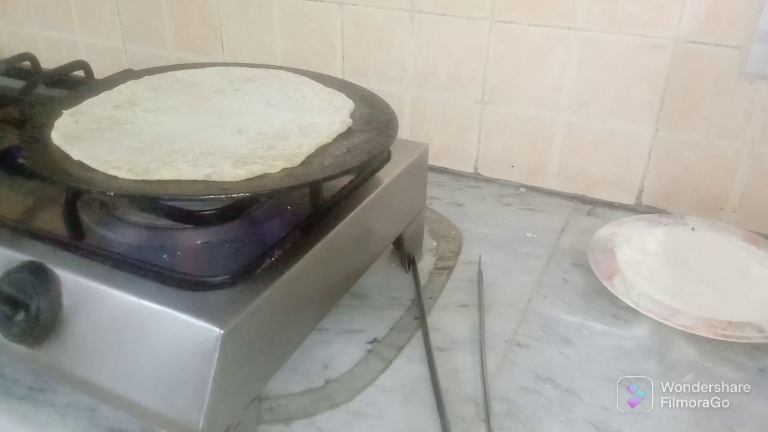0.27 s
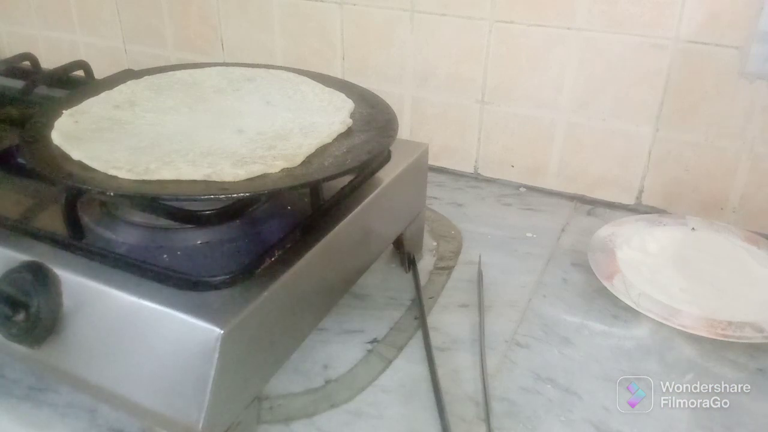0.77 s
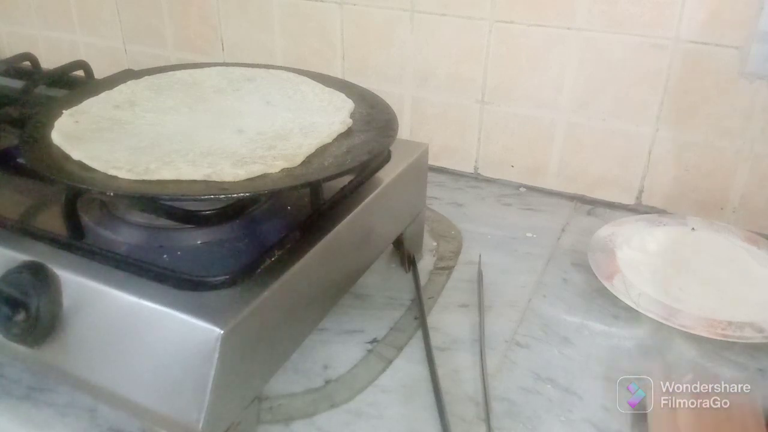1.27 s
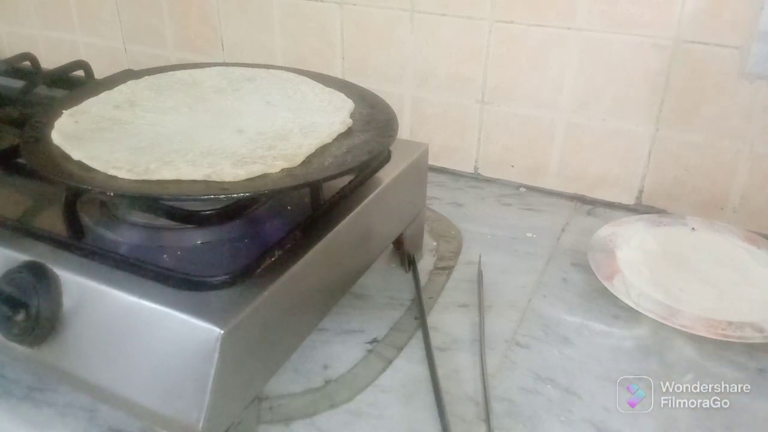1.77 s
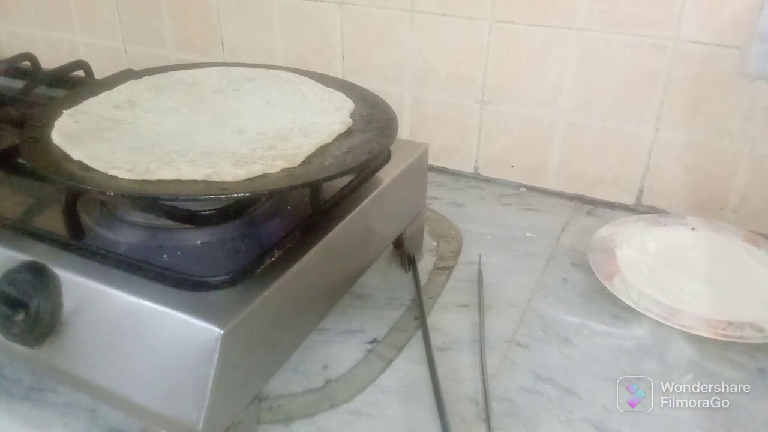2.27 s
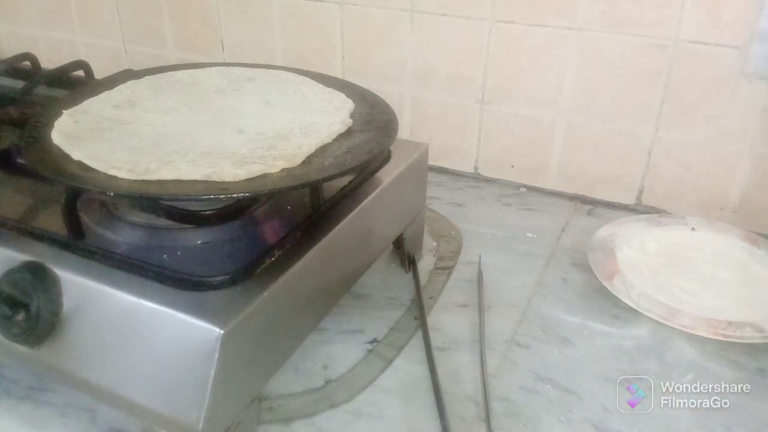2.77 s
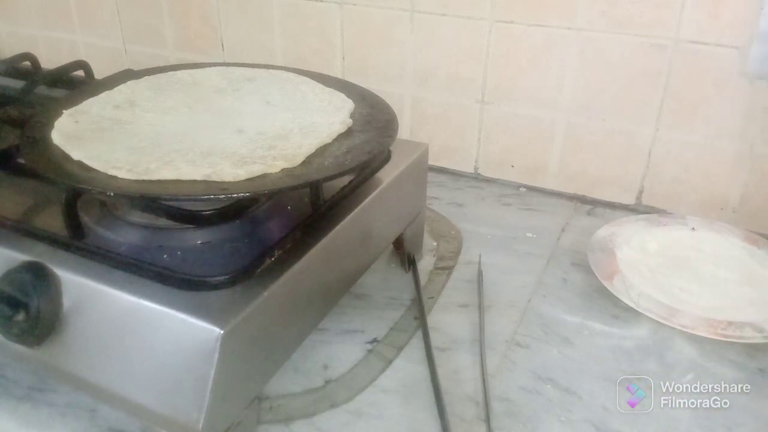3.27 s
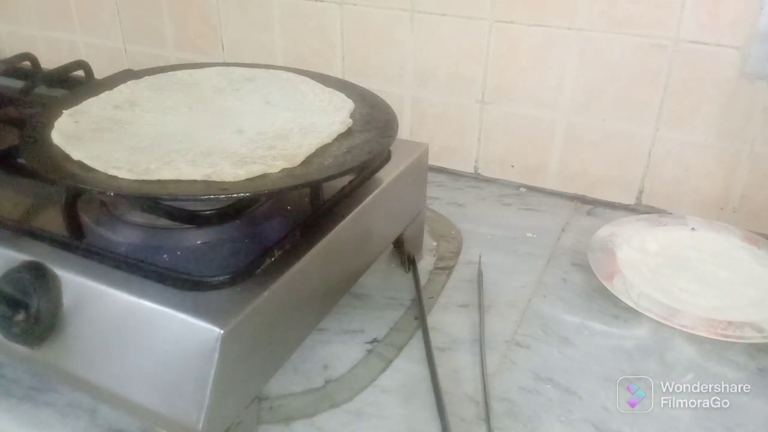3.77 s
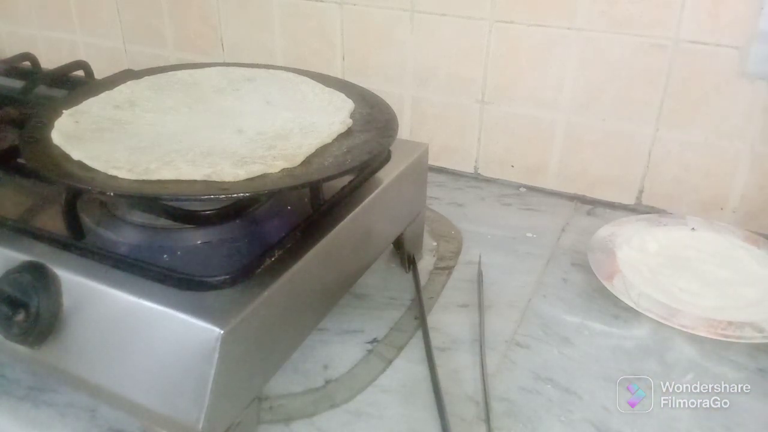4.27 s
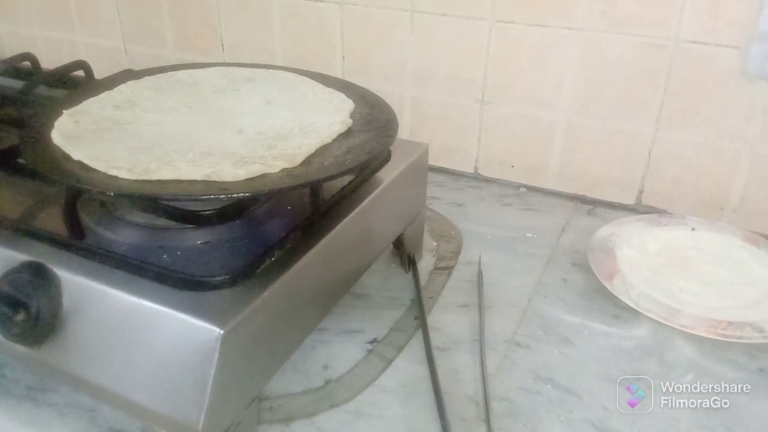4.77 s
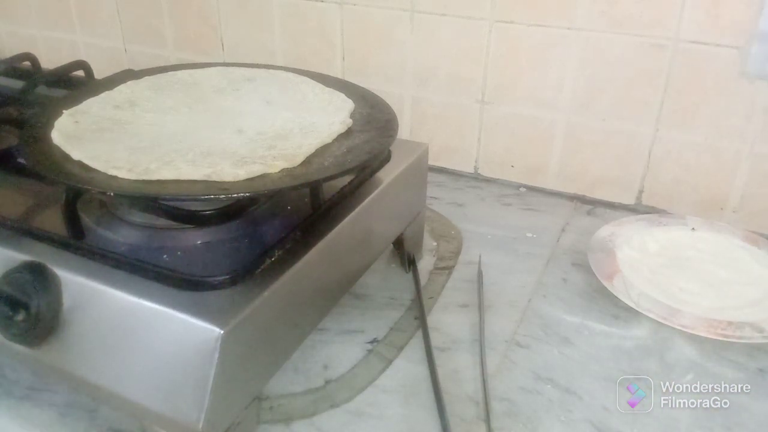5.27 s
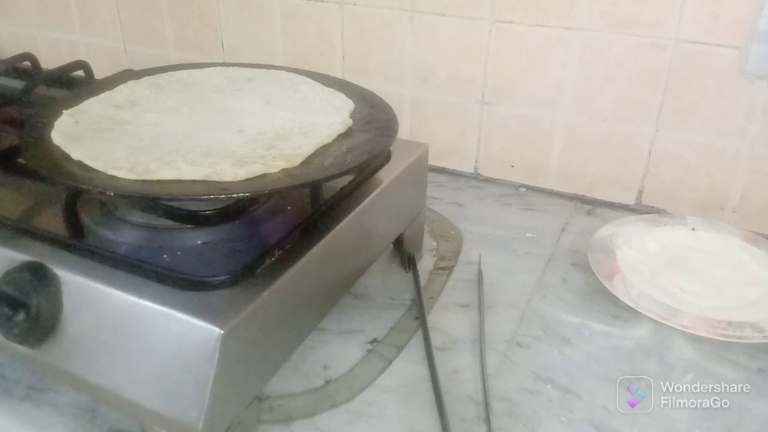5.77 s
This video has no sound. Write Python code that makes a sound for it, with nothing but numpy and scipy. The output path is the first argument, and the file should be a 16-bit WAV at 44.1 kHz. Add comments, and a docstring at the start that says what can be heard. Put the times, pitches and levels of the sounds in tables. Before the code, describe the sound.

Quick metallic scrubbing on a rough iron plate gives way to fainter scrapes and two strong thuds in a small tiled kitchen.

```python
"""A metal spatula scrubs to and fro over a dry iron surface in a tiled kitchen, briskly at first, then sparsely:
random tiny catches rasp and set the blade, its edge and the plate ringing.
A few dull knocks, sums of decaying modes, ring out into the room; the stove rocks and faint squeaks glide by.
Behind them a gas flame hisses softly as coloured noise, and the room hums in a few narrow bands.
Both channels carry the same scene, with very faint steady coloured noise, opposite in the two channels."""
import sys
import numpy as np
from scipy import signal
from scipy.fft import rfft, irfft, next_fast_len
from scipy.io import wavfile

SR = 44100
rng = np.random.default_rng(int(sys.argv[2]) if len(sys.argv) > 2 else 0)


def to_wav(s):
    """Save 16-bit WAV."""
    ch = np.atleast_2d(s).T  # columns
    pcm = np.round(np.clip(ch, -1, 1) * 32767)  # PCM
    wavfile.write(sys.argv[1], SR, pcm.astype(np.int16))


N = 264586   # samples, about 6 s


def scrub():
    """The catches of the strokes rasp broadly and set the blade, its edge and the plate ringing."""
    # pushes of the spatula: hardest push t/s, length/s, base rasp level/dB, plate ring over base rasp/dB
    strokes = [(.01, 0.44, -54, -1), (0.203, 0.23, -50, -16.5), (0.437, 0.27, -50.5, -16.5),
               (0.656, 0.24, -50, -15.5), (0.926, 0.34, -50.5, -10.5), (1.127, .16, -53.5, -8),
               (1.295, 0.24, -51, -13), (1.572, 0.27, -52, -11.5), (1.794, 0.24, -56, -2),
               (1.948, 0.18, -49, -7.5), (2.155, 0.18, -54.5, -16), (2.342, 0.24, -50.5, -19.5),
               (3.105, 0.39, -64.5, -9.5), (3.515, 0.3, -61, -7), (3.629, 0.23, -63.5, -24.5),
               (3.808, 0.063, -55.5, -21), (3.881, .15, -52, -16), (3.952, 0.072, -53, -17.5),
               (4.035, 0.18, -67.5, -7), (5.218, 0.12, -65, -6), (5.753, .2, -62, -8.5),
               (5.867, 0.075, -57, -3)]
    # colour of the rasp: f/Hz, relative level/dB
    rasp_colour = [(300, -30), (600, -10), (1400, -10), (1900, -1), (2450, -5), (3600, 2.5), (4700, -1.5),
                   (6100, 9.5), (7200, 4), (8300, -10), (10000, -18), (12500, -20.5), (14200, -32),
                   (15000, -6.5), (15450, -9.5)]
    # resonances of the blade's edge, the blade and the iron plate: f/Hz, width/Hz, relative level/dB
    edge_modes = [(5450, 210, -19), (5670, 70, -14.5), (6340, 370, -3.5), (7010, 160, -7.5),
                  (7550, 32, -14)]
    blade_modes = [(3320, 130, -6), (3490, 110, 0), (3750, 170, -1), (4170, 80, -9)]
    plate_modes = [(1275, 60, 0), (1990, 56, -15)]
    rise_share = 0.5   # part of a stroke spent speeding up
    blade_db, blade_trade = -27.5, 1.033   # blade over base rasp; dB it loses per dB the plate gains

    rasp_gain, blade_gain, plate_gain = 0, 0, 0
    for hardest, length, rasp_db, plate_db in strokes:
        shape = stroke_shape(hardest, rise_share * length, (1 - rise_share) * length)
        rasp_gain = rasp_gain + from_db(rasp_db) * shape
        blade_gain = blade_gain + from_db(rasp_db + blade_db - blade_trade * plate_db) * shape
        plate_gain = plate_gain + from_db(rasp_db + plate_db) * shape

    catches = grit(per_s=8200, size_db=1.5) * from_db(0.89 * drift(15.3))
    broad = patchy(coloured(catches, rasp_colour), patchy_db=3.0, rate=11.7)
    edge = ringing(catches, edge_modes, flicker_db=2.0, rate=30)
    rasp = rms_one(broad + from_db(-6.0) * edge)
    top = signal.sosfiltfilt(signal.butter(2, 9000, "high", fs=SR, output="sos"), rasp)
    brighter = (rasp_gain / from_db(-54)) ** .5   # a harder push makes sharper catches
    blade = blade_gain * ringing(catches, blade_modes, flicker_db=4, rate=15)
    plate = plate_gain * ringing(catches, plate_modes, flicker_db=0.5, rate=13.6)
    return rasp_gain * (rasp + brighter * top) + blade + plate


def stroke_shape(hardest, rise, fall):
    """The blade speeds up to its hardest push and slows down, in a rounded swell."""
    part = np.interp(np.arange(N) / SR - hardest, [-rise, 0, fall], [0, 1, 0])
    return np.sin(np.pi / 2 * part) ** 1.306


def grit(per_s, size_db):
    """Random tiny catches of the edge on the rough iron, of either sign and uneven size; rms 1."""
    sizes = from_db(size_db * np.minimum(rng.exponential(1, N), 5))
    signed = sizes * rng.choice([-1, 1], N)
    return rms_one(signed * (rng.random(N) < per_s / SR))


def ringing(x, modes, flicker_db, rate):
    """Modes under one drive, each swelling and fading on its own; rms 1."""
    return rms_one(sum(from_db(db + flicker_db * drift(rate)) * narrow(x, hz, w) for hz, w, db in modes))


def knocks():
    """Each blow favours the modes near its best frequency; low modes build up more slowly."""
    # blows: t/s, strength/dB, best excited f/Hz, spread/octaves (6 dB down), ring-time factor
    blows = [(0.928, -54.5, 2410, 1.32, 1.65), (2.017, -51.5, 1070, 1.76, 0.59),
             (3.4433, -22.5, 390, 2.72, 1.01), (4.542, -34, 574, 1.3, 0.86),
             (4.548, -23.5, 250, 0.29, 0.75), (4.696, -47, 245, 0.33, .7), (4.742, -42.5, 239, 0.4, 0.5),
             (5.8527, -38, 1000, 0.71, 0.39), (5.860, -47, 1080, 0.5, 0.37)]
    # modes of the struck body: f/Hz, relative level/dB, t60/s
    body_modes = [(42, -19.5, 0.7), (79, -4, 0.24), (101.5, 1, 0.17), (165.4, 3, 0.27), (196, -6.5, 0.12),
                  (246.5, -1.5, 0.29), (324.8, -1, 0.093), (375.6, 4, 0.11), (451, -3.5, 0.09),
                  (490, 4.5, 0.059), (580, -5, 0.069), (605, -4.5, 0.11), (668.6, 2.5, 0.073),
                  (721, -2, 0.061), (766, -1.5, 0.049), (856, 5.5, 0.028), (979, 3, 0.04),
                  (1006, 4.5, 0.071), (1151, -8, 0.075), (1250, -2, 0.084), (1332, 11, 0.021),
                  (1503, -5.5, 0.0268), (1670, -11, 0.043), (1972, 0, 0.053), (2356, -7, 0.036),
                  (2705, 6, 0.0084), (3056, -5.5, 0.028), (3450, -3.5, 0.021), (3860, -6, 0.026)]
    contact = signal.butter(2, 2340, fs=SR, output="sos")   # the contact dulls the blow above this, in Hz

    out, t = np.zeros(N), np.arange(SR) / SR
    luck = rng.normal(0, 1, (len(blows), len(body_modes)))
    for (s, db, best_hz, octaves, ring_factor), chances in zip(blows, luck):
        rings = 0
        for k, ((hz, mode_db, t60), chance) in enumerate(zip(body_modes, chances)):
            reach_db = -6.0 * (np.log2(hz / best_hz) / octaves) ** 2
            decay_db = -60 * t / (t60 * ring_factor)
            build_up = 1 - np.exp(-t * hz / 0.69)   # time constant 0.69 cycle
            shape = from_db(mode_db + reach_db + 2.2 * chance + decay_db) * build_up
            rings = rings + (-1) ** k * shape * np.sin(2 * np.pi * hz * t)
        rings = signal.sosfilt(contact, rings)
        at = round(s * SR)
        out[at:at + SR] += (from_db(db) * rings)[:N - at]
    return out


def rocking():
    """The stove rocks under the pushes: short swells of a low tone near 105 Hz."""
    # rocking swells: t/s, strength/dB
    swells = [(0.366, -63), (0.471, -56), (0.576, -51), (0.689, -71), (0.853, -51), (1.015, -49),
              (1.151, -57), (1.375, -65), (1.533, -71), (1.793, -52), (1.868, -48.5), (2.001, -51.5),
              (2.212, -51.5), (2.476, -63.5), (2.602, -55)]
    out, t = np.zeros(N), np.arange(SR // 4) / SR
    for (s, db), (detune, phase) in zip(swells, rng.random((len(swells), 2))):
        swell = t / 0.015 * np.exp(1 - t / 0.017)
        hz = 105 * (1 + 0.25 * (detune - .5))
        at = round(s * SR)
        out[at:at + len(t)] += from_db(db) * swell * np.sin(2 * np.pi * hz * t + phase)
    return out


def squeaks():
    """A gliding tone blurred by slow noise, under a smooth swell."""
    # faint squeaks: t/s, length/s, from f/Hz, to f/Hz, level at the top of the swell/dB
    glides = [(0.028, 0.089, 635, 676, -63), (1.08, 0.18, 515, 615, -66), (1.462, 0.33, 687, 690, -69),
              (3.082, 0.12, 6260, 6350, -61), (4.008, .09, 3580, 3500, -65.5),
              (4.435, 0.12, 2280, 2280, -65.5), (5.245, 0.27, 1008, 1100, -66)]
    width_hz = 91   # of the blur
    out = np.zeros(N)
    for s, length, from_hz, to_hz, db in glides:
        part = np.clip((np.arange(N) / SR - s) / length, 0, 1)
        phase = 2 * np.pi * np.cumsum(from_hz + (to_hz - from_hz) * part) / SR
        blur = drift(width_hz / 2) * np.cos(phase) + drift(width_hz / 2) * np.sin(phase)
        out += from_db(db) * np.sin(np.pi * part) * blur
    return out


def kitchen(x):
    """Dense echoes: noise in half-octave bands, each dying at its own rate after a short build-up."""
    # reverberation of the tiled room: f/Hz, t60/s
    room_t60 = [(60, 0.34), (250, 0.63), (700, 0.57), (1300, 0.51), (2000, 0.043), (5000, 0.45)]
    t, edges = np.arange(SR) / SR, 60 * 2 ** np.arange(0, 8, .5)
    white, tail = rng.standard_normal((2, SR)), 0
    for k, (low, high) in enumerate(zip(edges, edges[1:])):
        # neighbouring bands take different noise
        band = signal.sosfilt(signal.butter(2, [low, high], "band", fs=SR, output="sos"), white[k % 2])
        tail = tail + band * from_db(-60 * t / at_hz(room_t60, low))
    tail = tail * (1 - np.exp(-t / 0.00073))
    return from_db(-18) * signal.fftconvolve(x, tail / 10)[:N]


def background():
    """Flame hiss, stove rumble, a low tone and the narrow hums, each flickering on its own."""
    # colour of the flame hiss: f/Hz, relative level/dB
    flame_colour = [(25, -28.5), (86, 0), (200, -7), (410, -14.5), (2400, -24.5), (4000, -26), (5100, -24),
                    (5800, -22), (7100, -26), (8300, -38), (13500, -43.5), (15300, -33.5)]
    # low hum, before its flicker: t/s, stove rumble level/dB, wavering hum level/dB
    low_hum = [(0, -62.5, -85), (2.4, -66.5, -84.5), (3.4, -61, -77.5), (4.0, -73, -69), (4.4, -72, -63),
               (4.95, -71, -70.5), (5.3, -101, -64), (6, -96, -72.5)]
    # narrow bands of the room's hum: f/Hz, width/Hz, level before flicker/dB, flicker/dB
    hum_bands = [(502.7, 25, -84.5, 7.5), (991, 37, -77, 1.5), (1250, 60, -84, 4.5),
                 (2260, 190, -78.5, 1.7), (5030, 280, -81.5, 2), (5770, 210, -81.5, 4.5),
                 (7070, 200, -86, 1)]
    drone_hz, drone_db = 191.7, -67   # low tone; peak level before its flicker

    white = rng.standard_normal((2, N))
    rumble_db, waver_db = in_time(low_hum)
    flame = from_db(-64) * patchy(coloured(white[0], flame_colour), patchy_db=1.2, rate=12)
    rumble = from_db(rumble_db + 4.7 * drift(2.1)) * narrow(white[1], hz=102.8, width_hz=25)
    waver = from_db(waver_db + 4 * drift(5)) * narrow(white[1], hz=316.6, width_hz=16)
    hums = sum(from_db(db + flicker_db * drift(4.5)) * narrow(white[1], hz, w)
               for hz, w, db, flicker_db in hum_bands)
    drone_phase = 2 * np.pi * drone_hz * np.arange(N) / SR + 0.63 * drift(8.8)
    drone = from_db(drone_db + 1.9 * drift(4.2)) * np.sin(drone_phase)
    return flame + rumble + waver + hums + drone


def patchy(x, patchy_db, rate):
    """Narrow bands from 400 to 9000 Hz each swell and fade on their own."""
    edges = np.geomspace(400, 9000, num=28)
    bands = [signal.sosfilt(signal.butter(1, pair, "band", fs=SR, output="sos"), x)
             for pair in zip(edges, edges[1:])]
    return x + sum(band * (from_db(patchy_db * drift(rate)) - 1) for band in bands)


def coloured(x, spectrum):
    """x filtered by the spectrum; rms 1."""
    size = next_fast_len(N)
    hz = np.maximum(np.fft.rfftfreq(size, 1 / SR), 1)
    return rms_one(irfft(rfft(x, size) * from_db(at_hz(spectrum, hz)), size)[:N])


def resonance(x, hz, width_hz):
    """One two-pole resonance, gain 1 on top."""
    r = np.exp(-np.pi * width_hz / SR)
    zeros = np.array([1, 0, -1]) * (1 - r * r) / 2
    poles = [1, -2 * r * np.cos(2 * np.pi * hz / SR), r * r]
    return signal.lfilter(zeros, poles, x)


def narrow(x, hz, width_hz):
    """The resonance twice, for steep skirts; rms 1."""
    return rms_one(resonance(resonance(x, hz, width_hz), hz, width_hz))


def drift(rate):
    """Slow chance of spread 1: coarse noise through a double one-pole low-pass at rate Hz, run in."""
    r = np.exp(-80 * np.pi * rate / SR)   # one coarse step is 40 samples
    slow = signal.lfilter([1], [1, -2 * r, r * r], rng.standard_normal(N // 40 + 2002))[2000:]
    return np.interp(np.arange(N) / 40, np.arange(len(slow)), rms_one(slow))


def in_time(rows):
    """The columns of a curve at every sample."""
    s, *columns = np.transpose(rows)
    return [np.interp(np.arange(N) / SR, s, c) for c in columns]


def at_hz(points, hz):
    """A curve over frequency read on a log-frequency axis."""
    return np.interp(np.log(hz), np.log(np.array(points)[:, 0]), np.array(points)[:, 1])


def from_db(db):
    """dB to gain."""
    return 10 ** (np.asarray(db) / 20)


def rms_one(x):
    """x scaled to rms 1."""
    return x / np.sqrt(np.mean(x ** 2) + 1e-20)


def scene():
    """Both channels hear the same sound; the room answers the knocks and, more faintly, the rasp."""
    blows, rasp = knocks(), scrub()
    near = blows + rasp + rocking() + squeaks()
    room = kitchen(blows) + from_db(-13.5) * kitchen(rasp)
    mono = near + room + background()
    return np.array([mono, mono])


def record(dry):
    """A small microphone's weak bass and narrow treble dip, then very faint side noise and a steep top cut."""
    # colour of the very faint steady noise, opposite in the two channels: f/Hz, relative level/dB
    side_colour = [(35, -49.5), (60, -13), (231, -23), (312, -12.5), (497, -18), (1260, -12.5), (1740, -20),
                   (5580, -21), (7370, -41.5), (15500, -27)]
    heard = signal.sosfilt(signal.butter(2, 45, "high", fs=SR, output="sos"), dry)
    heard = heard - 0.74 * resonance(heard, hz=6500, width_hz=450)
    side_noise = from_db(-81.5) * coloured(rng.standard_normal(N), side_colour)
    heard = heard + side_noise * [[1], [-1]]
    return signal.sosfilt(signal.ellip(12, .5, 65, 15500, fs=SR, output="sos"), heard)


dry = scene()
out = record(dry)
to_wav(out)
```